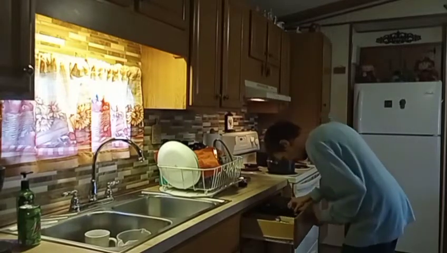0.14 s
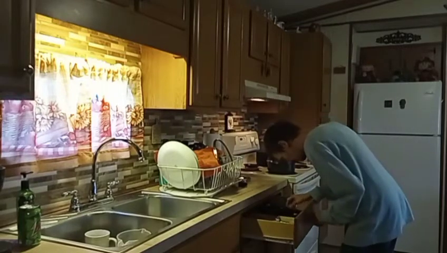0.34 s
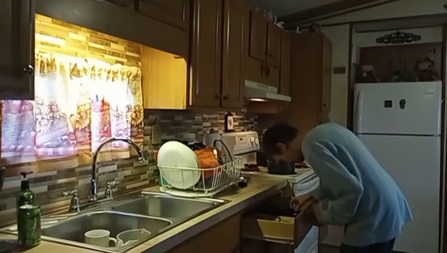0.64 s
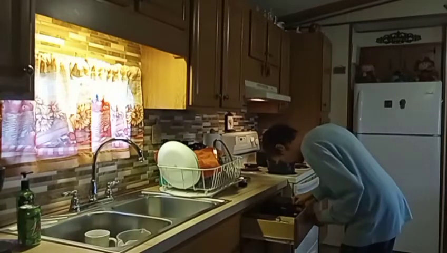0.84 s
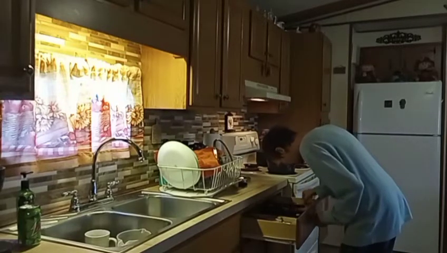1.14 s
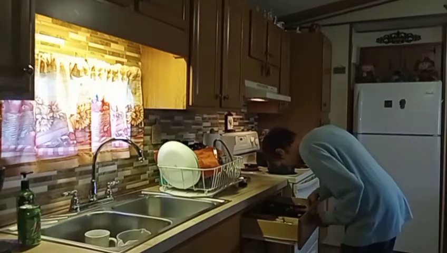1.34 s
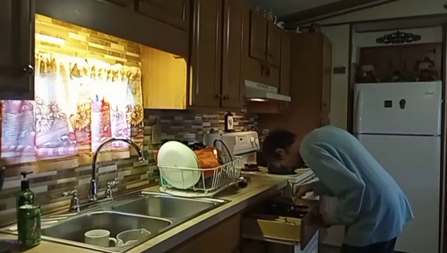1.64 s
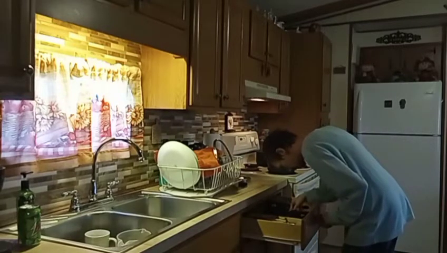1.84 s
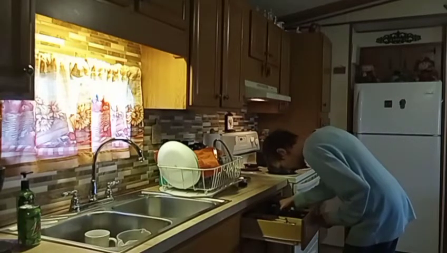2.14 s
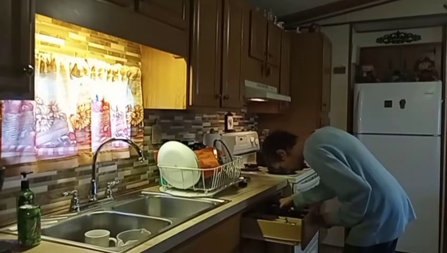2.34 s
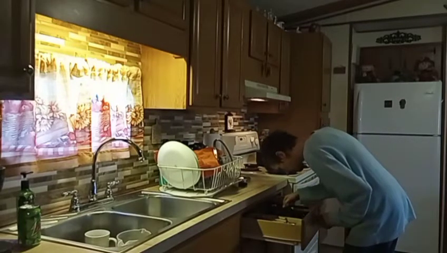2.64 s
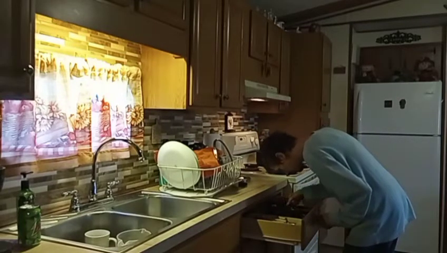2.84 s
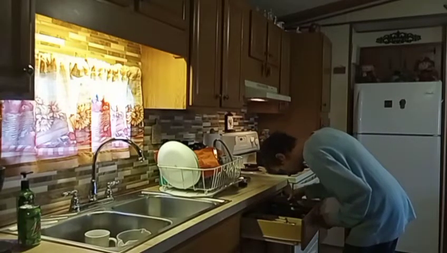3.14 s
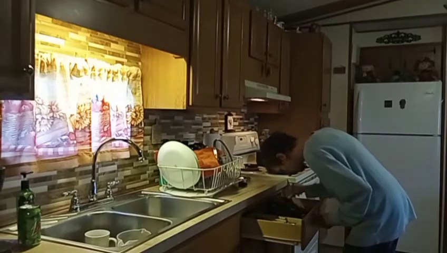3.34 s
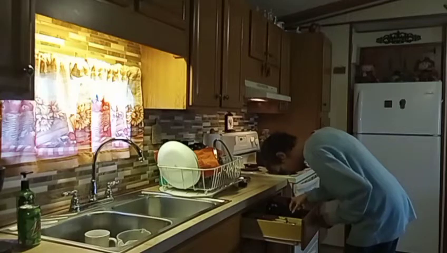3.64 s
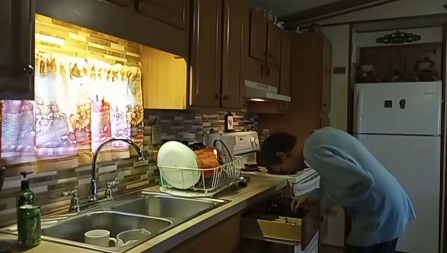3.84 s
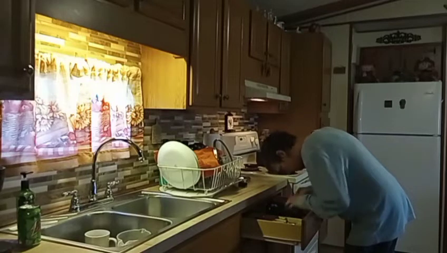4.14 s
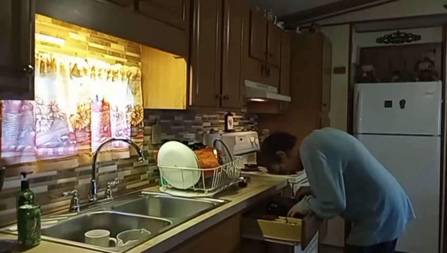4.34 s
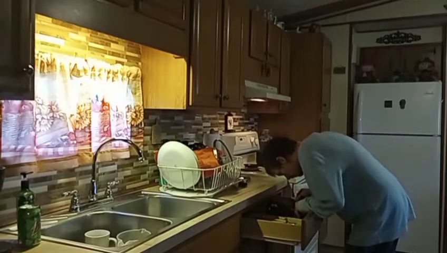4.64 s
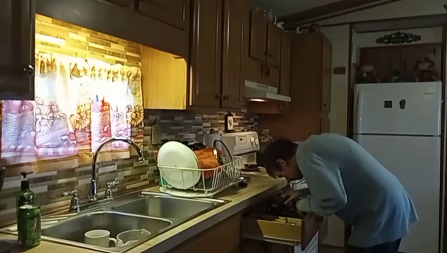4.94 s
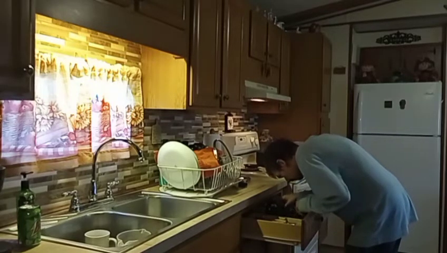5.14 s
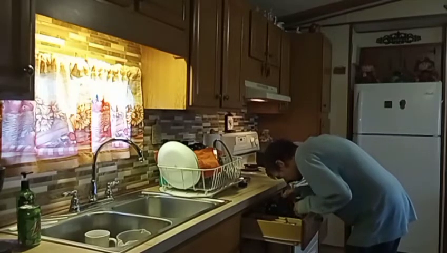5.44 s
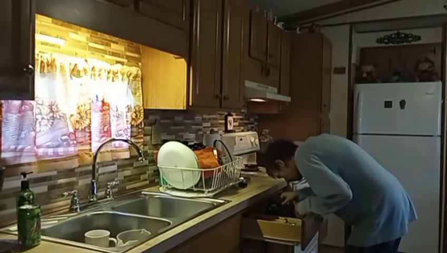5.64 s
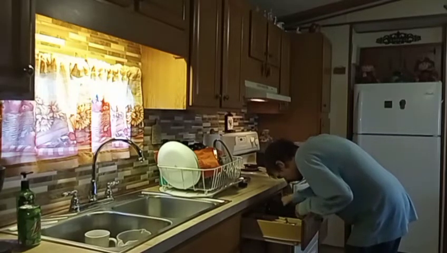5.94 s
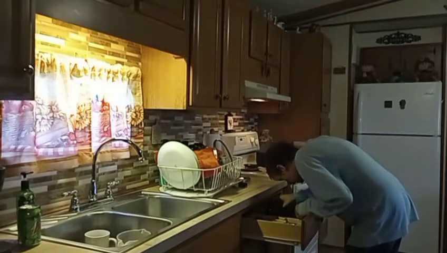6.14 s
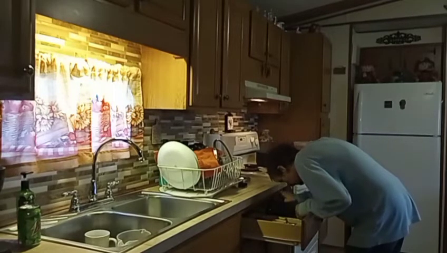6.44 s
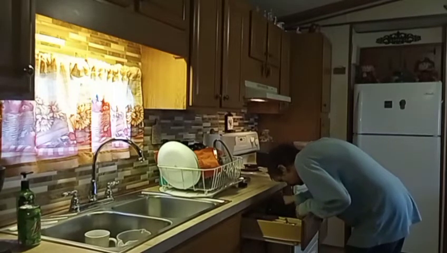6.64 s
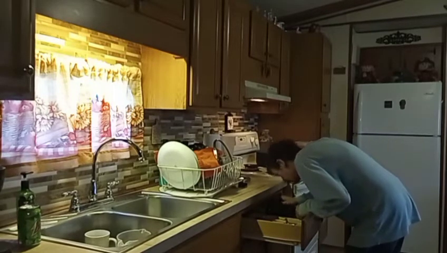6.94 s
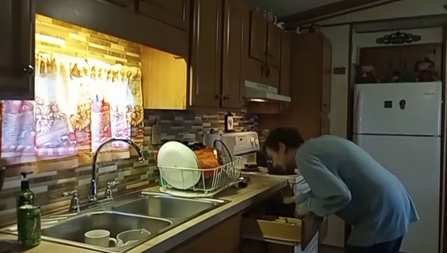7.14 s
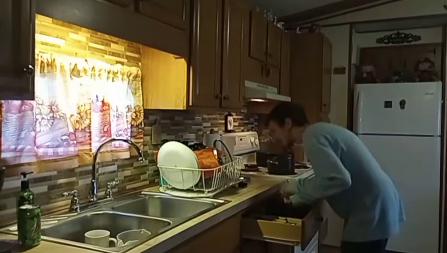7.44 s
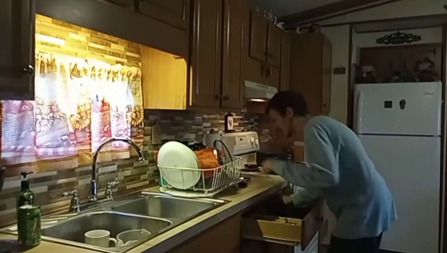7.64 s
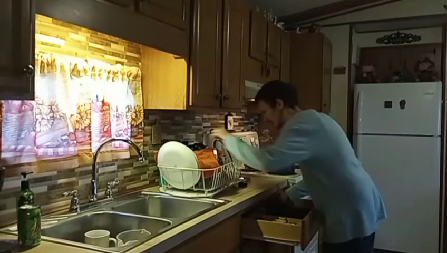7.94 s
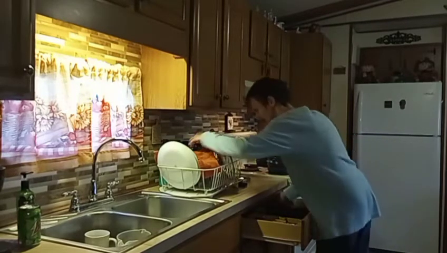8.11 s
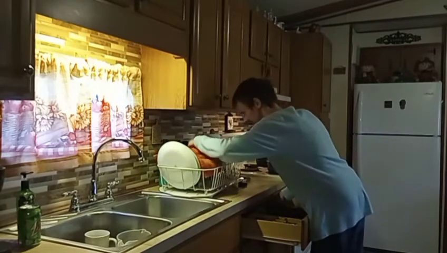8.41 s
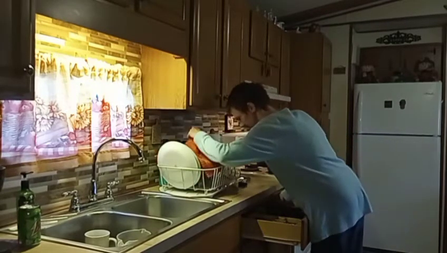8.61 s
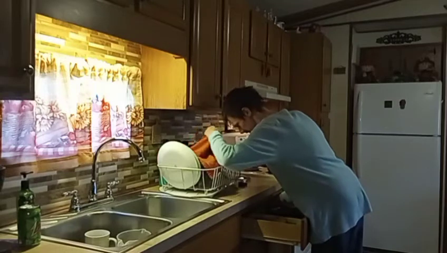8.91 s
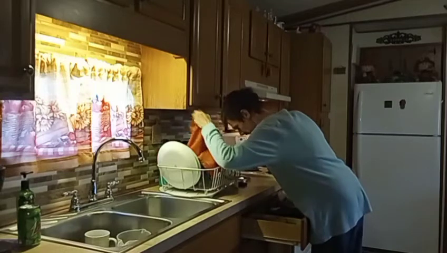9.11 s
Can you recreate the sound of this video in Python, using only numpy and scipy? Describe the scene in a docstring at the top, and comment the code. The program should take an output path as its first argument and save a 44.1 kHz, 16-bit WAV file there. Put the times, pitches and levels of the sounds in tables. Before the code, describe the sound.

Irregular clatter of steel and plastic utensils in a booming wooden drawer grows busier, thins out, then ends with sharp crockery knocks in a quiet kitchen.

```python
"""Bare kitchen, a camera's stereo microphones a few metres off: a fridge hums over dull room air throughout.
From 0 s a hand stirs a wooden drawer of utensils; from 0.2 s thuds boom the box and clacks ring the utensils.
Faint steel pings join at 1 s, deep cabinet thuds at 2 s: both are single fading modes struck by noise bursts.
At 8.4 s a bowl and at 9.2 s a plate is knocked in a nearer dish rack, each a sum of damped modes.
The room smears every blow into a noisy tail, which the camera's noise suppressor shortens."""
import sys
import numpy as np
from scipy import signal
from scipy.fft import rfft, irfft, next_fast_len
from scipy.io import wavfile
from scipy.ndimage import uniform_filter1d

SR = 44100
rng = np.random.default_rng(int(sys.argv[2]) if len(sys.argv) > 2 else 0)


def materialize(psi):
    """Save the field psi as 16-bit PCM at rate SR to the path in sys.argv[1].

    A 1-D psi becomes a single channel; in a 2-D psi each row is a channel.
    """
    bounded = np.clip(np.atleast_2d(psi).T, -1, 1)
    quanta = np.round(bounded * 32767).astype(np.int16)
    wavfile.write(sys.argv[1], SR, quanta)


def volts_from_db(level):
    """Convert decibel levels to linear amplitude ratios."""
    exponent = np.asarray(level, float) / 20
    return 10 ** exponent


N = 408807
TIME = np.arange(N) / SR


def unit(x):
    """Scaled to rms 1."""
    return x / np.sqrt(np.mean(x ** 2))


def along(table, hz, axis=1):
    """A table column read on a log-frequency axis."""
    table = np.array(table)
    return np.interp(np.log(hz + 1), np.log(table[:, 0] + 1), table[:, axis])


def colour(x, spectrum):
    """Filter by (Hz, dB) points, keeping the level of white noise."""
    size = next_fast_len(x.shape[-1])
    gain = unit(volts_from_db(along(spectrum, np.fft.rfftfreq(size, 1 / SR))))
    return irfft(rfft(x, size) * gain, size)[..., :x.shape[-1]]


def split(x, hz):
    """The parts below and above a frequency."""
    return [signal.sosfilt(signal.butter(3, hz, kind, fs=SR, output="sos"), x) for kind in ("low", "high")]


def ring(x, hz, t60):
    """One damped mode; an impulse of 1 rings with amplitude 1."""
    r = np.exp(-np.log(1000) / (t60 * SR))
    w = 2 * np.pi * hz / SR
    return signal.lfilter([np.sin(w)], [1, -2 * r * np.cos(w), r * r], x)


def pair(mid, side, like):
    """Left and right, alike by 0-1, from two unrelated signals."""
    return np.sqrt((1 + like) / 2) * mid + np.sqrt((1 - like) / 2) * side * np.array([[1], [-1]])


def bounce(length):
    """A contact that chatters: a burst of even spectrum that builds up fast, same energy however long (s)."""
    t = np.arange(4096) / SR
    fall = np.exp(-t / length) * (1 - np.exp(-t / (0.11 * length)))
    spec = rfft(rng.standard_normal(len(t)) * fall)
    burst = irfft(spec / np.abs(spec)) * fall ** 0.91
    return burst / np.sqrt(np.sum(burst ** 2))


def add(track, s, x):
    """Mix x into track at time s."""
    i = int(s * SR)
    track[i:i + len(x)] += x[:len(track) - i]


# room air at the microphones: [f/Hz, relative level/dB per Hz]
AIR_SPECTRUM = [(15, -69), (25, -20.5), (161, -11), (175, -15.5), (195, -1.5), (249, -19), (277, -13.5),
                (326, -27), (405, -24), (439, -15.5), (911, -34), (1650, -31.5), (7510, -45.5),
                (14000, -45), (16000, -43.5)]
# fridge compressor hum: [f/Hz, relative level/dB]
FRIDGE_HUM = [(193.8, -73.5), (290.7, -91)]


def fridge():
    """A wavering compressor hum over the room's dull rush, whose bass is nearly the same at both ports."""
    mid, side = colour(rng.standard_normal((2, N)), AIR_SPECTRUM)
    low = signal.butter(1, 700, fs=SR, output="sos")
    side = side - .7 * signal.sosfilt(low, side)
    rush = mid + side * np.array([[1], [-1]])
    waver = unit(ring(rng.standard_normal(N), 4.7, 0.24))
    hum = 0
    for hz, db in FRIDGE_HUM:
        hum = hum + np.sqrt(2) * volts_from_db(db + 2.1 * waver) * np.sin(2 * np.pi * hz * TIME)
    return volts_from_db(-72.5) * rush + volts_from_db(2.5) * hum


# the hand stirs the drawer: [start t/s, hold t/s, effort level/dB,
# front panel against box level/dB, steel against box level/dB]
HAND_STIRS = [(0, 0.017, -56.5, 2, -6), (0.254, 0.037, -53.5, -2.5, -12), (0.638, 0.16, -59, -3.5, -9),
              (0.962, 0.13, -66, -29, 0), (1.283, 0.1, -60, -2, -8), (1.9, 0.17, -53.5, -23, -14.5),
              (2.24, 0.23, -59, -11, -6.5), (2.472, 0.21, -43.5, -10, -17), (2.87, 0.02, -62.5, 10.5, -14),
              (3.1, 0.043, -57.5, -5, -18), (3.497, 0.18, -49, -26, -18), (3.78, 0.14, -47, -2.5, -8.5),
              (4.076, 0.24, -58.5, -13, -14), (4.419, 0.094, -55.5, 4.5, -9), (4.925, .04, -41.5, -13, -22),
              (5.022, 0.046, -43.5, -1.5, 1.5), (5.239, 0.16, -47, -4, -3.5), (5.567, 0.15, -44, -3.5, -14),
              (5.812, 0.16, -49, -4.5, -9.5), (6.13, 0.028, -53.5, 7, -4.5), (6.293, 0.46, -64, -9, -8.5),
              (6.852, 0.15, -64.5, 6.5, 1.5), (7.135, 0.079, -58.5, -5.5, -19),
              (7.412, 0.027, -60, -22, -18), (7.761, 0.071, -62, -9, -14), (8.17, .1, -69.5, -13.5, -17),
              (8.642, 0.07, -70.5, -7, 20), (9.01, .14, -68, -14, 1.5)]
STIR_RISE_DB_S, STIR_FALL_DB_S = 352, 164
RESTLESS_DB = -77.5  # the hand at rest


def stirring():
    """Gains of the box, the front panel and the steel: each stir swells, holds and dies away."""
    power = np.full((3, N), volts_from_db(RESTLESS_DB) ** 2)
    for s, hold, db, front_db, steel_db in HAND_STIRS:
        swell_db = -STIR_RISE_DB_S * np.maximum(s - TIME, 0)
        fade_db = -STIR_FALL_DB_S * np.maximum(TIME - s - hold, 0)
        shares_db = np.array([[0], [front_db], [steel_db]])
        power += volts_from_db(2 * (db + swell_db + fade_db)) * volts_from_db(2 * shares_db)
    return np.sqrt(power)


# modes of the wooden drawer box: [f/Hz, width f/Hz, relative level/dB]
DRAWER_MODES = [(155.2, 23, -13.5), (187, 21, -13), (290.5, 19, -2.5), (338, 23, -3.5), (420, 41, 0.5),
                (490, 22, 0), (528, 76, -1), (603.7, 30, -2.5), (700, 37, -0.5), (791, 54, 0),
                (854, 75, -5)]


def drawer(push, near_hz=None):
    """The wooden box booms in broad modes, most in those near the pitch of the panel struck."""
    out = 0
    for k, (hz, width, db) in enumerate(DRAWER_MODES):
        off_db = 0
        if near_hz is not None:
            off_db = -22 * min(abs(np.log2(hz / near_hz)), 1.5)
        sign = (-1) ** k
        out = out + sign * volts_from_db(db + off_db) * np.sqrt(width) * ring(push, hz, 1.4 / width)
    return out


def grains(rate, spread):
    """Scattered tiny contacts (mean rate per s), some stronger than the rest (spread dB)."""
    chance, sign = rng.random((2, N))
    sizes = volts_from_db(spread * np.minimum(rng.exponential(size=N), 3.5)) * np.sign(sign - .5)
    return unit((chance < rate / SR) * sizes)


# broad crack of utensils meeting: [f/Hz, relative level/dB per Hz]
CRACK_SPECTRUM = [(530, -4.5), (900, -0.5), (1230, -0.5), (2130, -1), (3920, -6.5), (4970, -5.5),
                  (7640, -15.5), (8000, -26), (10400, -33.5), (17600, -120)]
# their treble sheen: [f/Hz, relative level/dB per Hz]
SHEEN_SPECTRUM = [(3820, -35.5), (6500, -2), (7390, -23.5), (7910, -13), (11300, -4), (12900, -11.5),
                  (14700, 3.5), (15600, -27), (16000, -38.5)]
# rings of the loose steel pieces: [f/Hz]
STEEL_RINGS = [1340, 1700, 2120, 2750, 3440, 4300, 5400, 6600]
PANEL_HZ = 570  # the box sounds below, the front panel above


def rummage():
    """Utensils slide and jostle: soft bumps on the wood, small ticks that each ring another piece of steel."""
    rumble, hollow = split(drawer(grains(150, 3.0)), PANEL_HZ)
    ticks = grains(400, 2.2)
    pieces = 0
    for hz in STEEL_RINGS:
        pieces = pieces + unit(ring(grains(32, 4.2), hz, .02)) * volts_from_db(along(CRACK_SPECTRUM, hz))
    rattle = colour(ticks, CRACK_SPECTRUM) + volts_from_db(-18.5) * colour(ticks, SHEEN_SPECTRUM)
    rattle = rattle + volts_from_db(-9.5) * unit(pieces)
    return sum(unit(x) * gain for x, gain in zip((rumble, hollow, rattle), stirring()))


# bumps on the wood, and at 8.589 s a knock on the bowl sounded through the same modes: [t/s, relative blow
# level/dB, pitch of what is struck f/Hz, push time t/s]
BUMP_BLOWS = [(0.192, -54, 490, 0.024), (0.297, -39, 465, 0.0067), (0.33, -45.5, 790, 0.0046),
              (0.552, -50.5, 700, 0.0043), (0.672, -50, 527, 0.013), (0.684, -47, 770, 0.0064),
              (0.779, -43.5, 723, 0.011), (1.077, -45, 450, 0.0042), (1.305, -39, 388, 0.006),
              (1.396, -45, 715, 0.0056), (1.886, -50.5, 298, 0.0054), (1.93, -44, 510, 0.0086),
              (2.02, -39, 450, 0.0014), (2.254, -44.5, 372, 0.016), (2.299, -46.5, 695, 0.0053),
              (2.374, -49.5, 596, 0.0058), (2.477, -42, 470, 0.013), (2.565, -37, 866, 0.003),
              (2.877, -42.5, 305, 0.012), (2.925, -47, 540, 0.0039), (3.102, -42.5, 433, 0.0053),
              (3.185, -48, 425, 0.0064), (3.425, -31.5, 378, 0.0081), (3.541, -44, 670, 0.0083),
              (3.738, -41.5, 373, 0.017), (3.816, -51, 740, .005), (3.852, -44, 730, 0.0059),
              (3.892, -42.5, 740, 0.0058), (4.035, -41, 720, 0.0033), (4.231, -49.5, 402, 0.012),
              (4.271, -50, 790, 0.0057), (4.429, -38, 446, 0.0035), (4.654, -49.5, 420, 0.0033),
              (4.73, -41, 570, 0.011), (4.831, -47, 402, 0.0023), (4.919, -31.5, 690, 0.0037),
              (5.011, -30, 323, 0.016), (5.24, -46, 427, 0.022), (5.315, -42, 740, 0.0045),
              (5.472, -38, 410, 0.0053), (5.592, -42.5, 490, 0.0094), (5.626, -32, 450, 0.029),
              (5.76, -38, 450, 0.0051), (5.895, -33.5, 623, 0.0032), (6.07, -58, 532, 0.011),
              (6.157, -38, 475, 0.0051), (6.816, -40, 207, 0.011), (6.848, -48, 450, 0.03),
              (6.921, -40, 290, 0.0069), (7.14, -54, 466, 0.0063), (7.198, -46.5, 289, 0.0061),
              (7.35, -52, 490, 0.0092), (7.429, -52.5, 703, 0.01), (7.617, -59.5, 450, 0.011),
              (7.682, -50.5, 450, 0.0046), (7.782, -53.5, 288, 0.021), (7.85, -48.5, 400, 0.0034),
              (8.589, -36.5, 920, 0.011), (8.933, -39, 442, 0.0019), (8.967, -42.5, 484, 0.02),
              (9.136, -50, 456, 0.0071), (9.203, -43, 1030, 0.0063)]


def bumps():
    """Handles and knuckles thud on the drawer, and once the bowl is knocked: a chattering push sets the
    drawer's modes booming."""
    out = np.zeros(N)
    for s, db, hz, length in BUMP_BLOWS:
        push = np.pad(bounce(length), (0, 4096))
        add(out, s, volts_from_db(db) * drawer(push, hz))
    return volts_from_db(-5.0) * out


# utensil clacks: [t/s, relative blow level/dB, relative brightness level/dB,
# relative treble level/dB, pitch of the piece f/Hz]
UTENSIL_CLACKS = [(.1972, -60.5, -5.5, -39, 3280), (0.2454, -58.5, -5, -38, 2200),
                  (0.2604, -58, -18, -30, 2300), (0.3295, -49.5, -18, -28, 2100),
                  (0.5282, -52, -16.5, -41, 2180), (0.6648, -55, -14, -18, 2240),
                  (0.6874, -52.5, -13, -35, 2520), (0.8331, -56.5, -29, -41, 1700),
                  (1.039, -59.5, 2, -8, 1990), (1.0806, -55.5, -2.5, -12, 2100),
                  (1.3028, -54, -7.5, -20, 1870), (1.3967, -51, -7, -16, 6160),
                  (1.925, -45.5, -21, -63, 1880), (2.0142, -43, -12.5, -26, 1810),
                  (2.252, -49, -23, -29, 1730), (2.381, -56, -17, -16, 1480), (2.4483, -54, -8, -19, 1700),
                  (2.4719, -39.5, -13, -24, 1350), (2.491, -41.5, -14, -32, 1860),
                  (2.5694, -36, -11.5, -19, 1910), (2.626, -39.5, -14, -39, 2090),
                  (2.7237, -53.5, -9, -20, 1490), (2.8765, -57.5, -30, -28, 1830),
                  (2.9, -63, -0.5, -13, 1780), (3.1009, -59, -11, -20, 2140), (3.123, -64, -18, -45, 1300),
                  (3.1881, -60.5, -9, -36, 1520), (3.4177, -36.5, -7, -15.5, 1590),
                  (3.519, -43.5, -8, -19.5, 1840), (3.739, -52, -8, -18, 1230),
                  (3.761, -49.5, -1, -16, 1890), (3.7774, -44.5, -39, -46.5, 1360),
                  (3.8094, -49, -30, -41, 1570), (3.8544, -38.5, -18, -50, 1640),
                  (3.9432, -42.5, -14.5, -50, 1590), (4.0363, -44.5, -20, -33, 1510),
                  (4.2183, -50.5, -12.5, -24, 1680), (4.2837, -57.5, -33, -36, 1700),
                  (4.399, -63, -12, -19, 1410), (4.4295, -55, -2, -17, 1480), (4.4455, -45, -43, -35, 1640),
                  (4.487, -49.5, -26, -26, 1630), (4.655, -55, -16.5, -37, 1670),
                  (4.722, -37.5, -12, -26.5, 1460), (4.833, -46.5, -44, -40.5, 1800),
                  (4.9197, -29.5, -12, -36.5, 2020), (5.008, -25.5, .5, -10.5, 5320),
                  (5.241, -42, 0, -18.5, 1910), (5.2475, -42.5, -14, -16.5, 1700),
                  (5.4112, -42.5, -17, -49, 1690), (5.461, -44, -8.5, -30, 1900),
                  (5.5797, -46, -9.5, -46, 1320), (5.5976, -32, -12, -46, 2000),
                  (5.6656, -30, -7.5, -17.5, 2050), (5.821, -40.5, -28, -38, 1310),
                  (5.8985, -30.5, -18.5, -33.5, 1700), (6.065, -42, -16.5, -42, 1500),
                  (6.074, -38.5, -21.5, -40, 1900), (6.1341, -32, -10, -31, 3190),
                  (6.5924, -52.5, -31.5, -43.5, 2065), (6.8925, -57, -21.5, -16, 1840),
                  (6.9167, -37.5, -15.5, -34, 1340), (7.014, -58, 6.5, -9.5, 1500),
                  (7.1372, -55.5, -15, -31, 1860), (7.2, -58, -12, -26, 1370), (7.3, -70, 1.5, -17, 4900),
                  (7.366, -59.5, -1.5, -11.5, 1380), (7.424, -53, -4, -18, 2250),
                  (7.4315, -53.5, 4, -7, 4300), (7.617, -58, -2.5, -21, 2430), (7.678, -56, -2, -17, 1090),
                  (7.6887, -53, -1.5, -10, 2550), (7.7834, -59, -16, -27, 1590),
                  (7.8428, -49.5, -8.5, -50, 1950), (7.942, -69.5, 5.5, -12, 4500),
                  (8.392, -61.5, -7, -20.5, 1510), (8.5624, -53, -10.5, -9.5, 1580),
                  (8.5932, -35, -8, -12, 1650), (8.609, -53, 5, 14.5, 1600),
                  (8.9322, -44.5, -11, -25, 1720), (8.9645, -37, -13, -24, 2310),
                  (9.2041, -25, -10, -12.5, 2870)]
BRIGHT_HZ = 3500
CLACK_BOUNCE_S = 0.0061  # how long a clack chatters
TOUCH_LEAD_S, TOUCH_DB = .006, -13  # pieces brush just before they strike
TOUCH_MOST_DB = -50.5  # ceiling of a brush on the scale of the blow levels
REBOUND_S, REBOUND_DB = .03, -9  # they knock again 0.5 to 1.5 times this long after the blow


def clacks():
    """Steel and plastic meet: a broad crack with a short damped ring."""
    dull, bright, sheen, rings = np.zeros((4, N))
    for s, db, bright_db, treble_db, hz in UTENSIL_CLACKS:
        touch_db = min(TOUCH_DB, TOUCH_MOST_DB - db)
        rebound_s = TOUCH_LEAD_S + REBOUND_S * (.5 + rng.random())
        hit = np.zeros(8192)
        for late, part_db in ((0, touch_db), (TOUCH_LEAD_S, 0), (rebound_s, REBOUND_DB)):
            add(hit, late, volts_from_db(db + part_db) * bounce(CLACK_BOUNCE_S))
        start = s - TOUCH_LEAD_S
        add(dull, start, hit)
        add(bright, start, volts_from_db(bright_db) * hit)
        add(sheen, start, volts_from_db(treble_db) * hit)
        add(rings, start, ring(hit, hz, 0.011))
    low_crack = split(colour(dull, CRACK_SPECTRUM), BRIGHT_HZ)[0]
    high_crack = split(colour(bright, CRACK_SPECTRUM), BRIGHT_HZ)[1]
    crack = low_crack + volts_from_db(11.5) * high_crack
    return volts_from_db(23.5) * crack + volts_from_db(4.0) * rings + volts_from_db(29.5) * colour(sheen, SHEEN_SPECTRUM)


def lone_ring(db, hz, t60):
    """A single fading mode set off by a short chattering contact."""
    return volts_from_db(db + 8.5) * ring(np.pad(bounce(.015), (0, 16384)), hz, t60)


# faint pings of free-hanging steel: [t/s, relative blow level/dB, f/Hz, t60 t/s]
STEEL_PINGS = [(.97, -64, 2040, .05), (1.149, -69, 3070, .15), (2.882, -53.5, 1886, 0.048),
               (3.191, -62, 1840, 0.081), (3.309, -48.5, 1840, 0.014), (3.32, -65, 3780, .03),
               (6.806, -46, 5680, 0.0053), (6.81, -57.5, 4470, 0.02), (7.94, -66, 3240, 0.052)]


def pings():
    """Thin steel hangs free and rings in one tone, mostly high up."""
    out = np.zeros(N)
    for s, db, hz, t60 in STEEL_PINGS:
        add(out, s, lone_ring(db, hz, t60))
    return out


# deep thuds of the cabinet: [t/s, relative blow level/dB, f/Hz]
CABINET_THUDS = [(2.048, -52, 181), (2.569, -42, 178), (3.748, -44, 130), (5.024, -55, 143),
                 (5.928, -52, 152), (6.269, -43, 138), (6.309, -43.5, 152), (6.356, -55.5, 159.3),
                 (8.596, -71, 140), (9.194, -42, 168)]


def thuds():
    """The cabinet answers far down, in one mode that dies in about a tenth of a second."""
    out = np.zeros(N)
    for s, db, hz in CABINET_THUDS:
        add(out, s, lone_ring(db, hz, .12))
    return out


# crockery knocks, a list for the bowl and one for the plate: [t/s, relative blow level/dB]
DISH_KNOCKS = [
    [(8.374, -60.5), (8.387, -52), (8.565, -47), (8.592, -30.5), (8.656, -41), (8.729, -49.5)],
    [(9.205, -27)],
]
# modes of the bowl, then of the plate: [f/Hz, relative level/dB, t60 t/s]
DISH_MODES = [
    [(824, -14, 0.056), (891, -1.5, 0.088), (930, -1.5, 0.068), (1640, -4.5, 0.054), (2530, -6.5, 0.038),
     (3287, -8.5, 0.059), (5600, -24, 0.059)],
    [(1053, 1.5, 0.024), (1800, -0.5, 0.035), (2763, 4, 0.044), (3287, 2.5, 0.03), (3985, -12.5, 0.14),
     (5360, -15, 0.018)],
]
SOFT_DULLS = 0.33  # dB per octave above the lowest mode, for each dB a knock is softer than the dish's hardest


def crockery():
    """A bowl, then a plate, knocked in the rack; neighbours damp the ring, soft knocks sound duller."""
    out = np.zeros(N)
    for knocks, modes in zip(DISH_KNOCKS, DISH_MODES):
        hardest_db = max(row[1] for row in knocks)
        for s, db in knocks:
            hit = np.pad(bounce(.0025), (0, 8192))
            slope_db = SOFT_DULLS * (db - hardest_db)
            for hz, mode_db, t60 in modes:
                dull_db = slope_db * np.log2(hz / modes[0][0])
                add(out, s, volts_from_db(db + mode_db + dull_db) * ring(hit, hz, t60))
    return volts_from_db(4) * out


# bare kitchen: [f/Hz, t60 t/s, likeness of left and right 0-1]
KITCHEN_DECAY = [(60, 0.75, .7), (188, 0.19, 1), (450, 0.37, 0.89), (900, 0.4, 0), (2437, 0.44, 0.1),
                 (6000, .42, 0), (14000, 0.26, 0.05)]


def kitchen():
    """Response of the room: direct sound, then dense echoes dying band by band."""
    t = np.arange(SR // 2) / SR
    tail = 0
    for hz in 50 * 2 ** np.arange(0, 8.6, .5):  # half-octave bands
        band = signal.butter(2, [hz / 2 ** .25, hz * 2 ** .25], "bandpass", fs=SR, output="sos")
        mid, side = signal.sosfilt(band, rng.standard_normal((2, len(t))))
        echoes = pair(mid, side, along(KITCHEN_DECAY, hz, axis=2))
        tail = tail + echoes * 1000 ** (-t / along(KITCHEN_DECAY, hz))
    tail = tail * (1 - np.exp(-t / 0.00047))  # echoes build up
    tail = tail * (1 + 0.56 * np.exp(-t / 0.03))  # worktop and cupboard doors give strong early echoes
    tail = tail / np.sqrt(np.sum(tail ** 2) / 2)
    for side in (0, 1):
        tail[side, rng.integers(6)] = volts_from_db(-9.5)  # direct sound
    return tail


# where the hand is, before the room's echoes: [t/s, left minus right level/dB]
HAND_PLACE = [(0, 1), (1, -1.5), (2.2, 0.5), (3.2, -.5), (6.3, -1), (7.1, -4), (7.8, -3.5), (8.3, -1),
              (9.27, -1.5)]


def scene():
    """Hand sounds through the room, placed left or right, over the fridge."""
    pan_db = np.interp(TIME, *np.transpose(HAND_PLACE))
    small = signal.butter(3, 160, "high", fs=SR, output="sos")  # small things radiate little bass
    utensils = signal.sosfilt(small, rummage() + bumps() + clacks() + pings() + thuds())
    dishes = signal.sosfilt(small, crockery())
    placed = (utensils + volts_from_db(-0.5) * dishes) * volts_from_db(np.array([pan_db, -pan_db]) / 2)
    # the hand roams over three spots, and each spot has echoes of its own
    wet = 0
    for k in range(3):
        spot = np.cos(np.pi * (3.1 * TIME + k / 3)) * np.sqrt(2 / 3)
        wet = wet + signal.oaconvolve(placed * spot, kitchen(), axes=1)[:, :N]
    # the rack stands nearer than the drawer, so more of it arrives direct
    return wet + volts_from_db(-2.0) * dishes + fridge()


def low_pass(x):
    """Removes everything above the highest recorded frequency."""
    return signal.sosfilt(signal.butter(12, 16780, fs=SR, output="sos"), x)


def record(dry):
    """The camera's suppressor turns down whatever falls below the recent average of its range."""
    spec = signal.stft(dry, nperseg=512)[2]
    log_power = np.log(np.mean(np.abs(spec) ** 2, axis=0) + 1e-18)
    power = np.exp(uniform_filter1d(log_power, size=41, axis=0))  # ranges 41 bins wide

    def average(k):
        """Running mean over time; a smaller k remembers longer."""
        return signal.lfilter([k], [1, k - 1], power, zi=(1 - k) * power[:, :1])[0]

    now, recent = average(.4), average(.03)
    gain = np.clip((now / (0.98 * recent)) ** 0.21, volts_from_db(-24), 1)
    clean = signal.istft(spec * gain, nperseg=512)[1][:, :N]
    top = signal.ellip(8, .2, 60, 15700, fs=SR, output="sos")  # steep low-pass, Hz
    return low_pass(signal.sosfilt(top, clean))


dry = scene()
out = record(dry)
materialize(out)
```